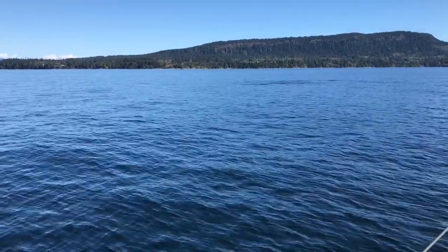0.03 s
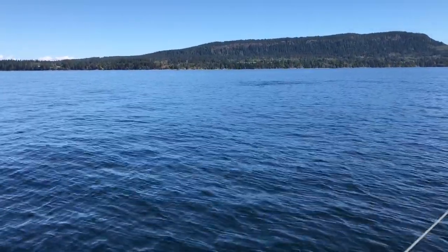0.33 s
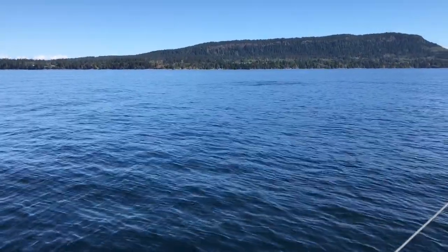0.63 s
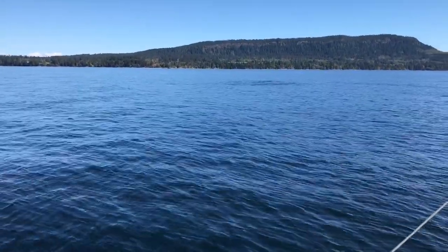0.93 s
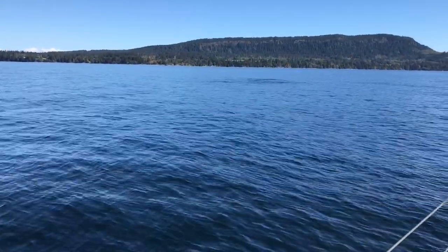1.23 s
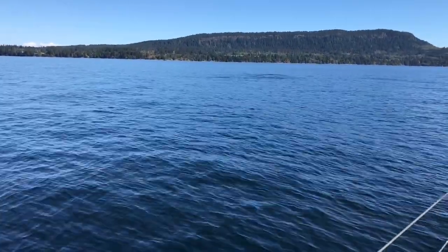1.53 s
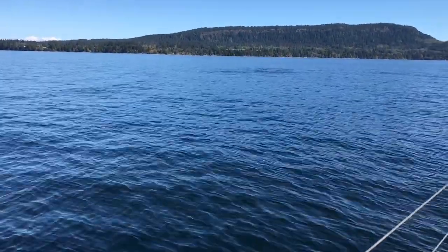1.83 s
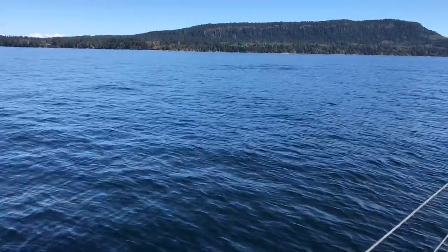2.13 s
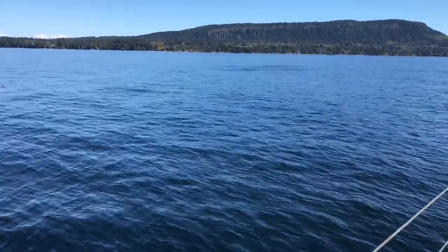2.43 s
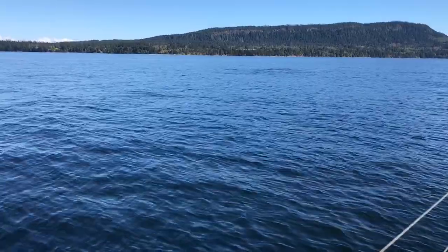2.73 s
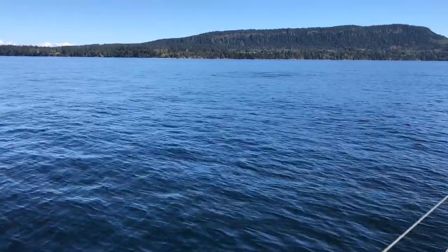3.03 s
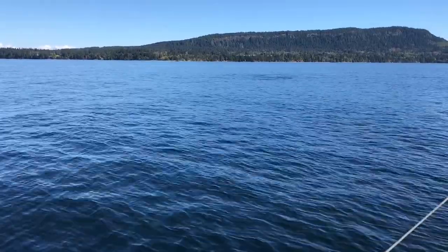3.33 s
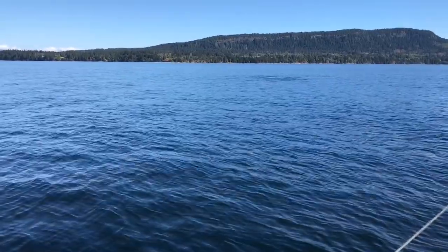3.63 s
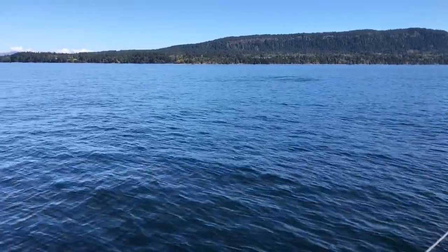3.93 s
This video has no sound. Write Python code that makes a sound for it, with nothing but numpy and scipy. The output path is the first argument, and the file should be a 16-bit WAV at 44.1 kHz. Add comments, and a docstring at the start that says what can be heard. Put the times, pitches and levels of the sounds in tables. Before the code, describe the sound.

A small boat's inboard engine chugs steadily, heard from on board over low wind. Early on, a wave rushes up the hull and collapses in hollow thumps. A few drops plop nearby, then a second wave splashes near the end.

```python
"""Small boat on open water

An inboard engine chugs along, throbbing through the hull under its clatter and thin gear whines.
Twice a wave runs up the side with a rush, throws spray and collapses in low thumps of trapped air.
Drops tick and plop nearby and foam fizzes, over a faint hiss of water and a low rumble of wind."""
import sys
import numpy as np
from scipy import signal
from scipy.fft import rfft, irfft
from scipy.io import wavfile
from scipy.ndimage import uniform_filter1d

SR = 44100
rng = np.random.default_rng(int(sys.argv[2]) if len(sys.argv) > 2 else 0)


def digitize_waveform(pressure):
    """Quantize a signal to 16-bit integers and store it at the path in sys.argv[1].

    Rows of a 2-D input are taken as channels; values are limited to [-1, 1].
    """
    field = np.atleast_2d(pressure).T
    bounded = np.clip(field, -1, 1)
    quanta = np.round(bounded * 32767).astype(np.int16)
    wavfile.write(sys.argv[1], SR, quanta)


N = 176400
T = np.arange(N) / SR

# The engine's drifting pace: time_s, cycles_per_s
ENGINE_SPEED = [(0.0, 12.792), (0.1, 12.782), (0.4, 13.245), (0.62, 13.123), (0.97, 13.39), (1.12, 13.134),
                (1.5, 13.286), (1.92, 12.78), (2.1, 12.933), (2.35, 12.396), (2.52, 12.931), (2.72, 12.914),
                (3.02, 12.434), (3.3, 12.722), (3.55, 12.47), (4.0, 12.748)]
# Exhaust and hull throbs in every engine cycle: place_cycles, cruise_pitch_hz, length_s, peak_db
ENGINE_THROBS = [(0.34, 71.5, 0.03, -30.5), (0.69, 60.6, 0.13, -33.5), (.819, 105, 0.041, -36),
                 (.84, 178.3, 0.064, -42.5), (.21, 175, 0.042, -44.5), (.52, 343, 0.052, -44.5),
                 (.05, 333, 0.051, -46)]
# Tone colour of the engine clatter: frequency_hz, relative_db
CLATTER_SPECTRUM = [(250, 14.5), (450, -2), (900, -3.5), (1600, -0.5), (2200, -8.5), (3100, -5.5),
                    (4400, -14.5), (5000, -38), (9000, -73)]
# Whines of the running gear: cruise_pitch_hz, level_db, loudest_place_cycles
GEAR_WHINES = [(697, -69, 0.45), (1245, -74.5, .76), (1424, -79, .76), (1600, -80, 0.68),
               (2120, -82.5, .76), (2505, -75, 0.71), (3085, -81, 0.6), (3490, -85, 0.63)]
# Tone colour of wind and distant water: frequency_hz, relative_db
AIR_SPECTRUM = [(15, -50), (28, -29), (45, -5), (70, -2), (120, -1.5), (200, -5.5), (280, -9), (450, -16),
                (1000, -23), (3000, -33), (4800, -43), (6000, -42), (8000, -48), (10300, -50),
                (12000, -47.5), (15500, -48)]
# The swell and fall of each wave, one list per wave: time_s, level_db, centre_hz
WAVE_SHAPES = [
    [(.1, -70, 905), (.32, -57.5, 810), (.42, -51, 744), (.52, -46, 776), (.555, -40.5, 840),
     (.605, -39, 870), (.645, -38.5, 670), (.7, -38.5, 656), (.74, -41.5, 614), (.79, -43.5, 520),
     (.86, -55, 484), (1.02, -57, 494), (1.1, -83, 500)],
    [(3.2, -69, 600), (3.38, -58, 600), (3.46, -50, 640), (3.57, -47, 530), (3.61, -37, 525),
     (3.645, -40, 575), (3.705, -37, 640), (3.77, -37.5, 510), (3.84, -41, 490), (3.89, -52, 420),
     (4, -56, 435)],
]
# Tone colour of a wave's rush: from_centre_octaves, relative_db
RUSH_SPECTRUM = [(-10, -25), (-6, 6.5), (-1.5, 3), (0.03, -0.5), (-0.11, 7), (0.04, -1.5), (2, -18),
                 (2, -17.5), (2.5, -36.5), (5.5, -57)]
# The hollow between hull and water, colouring every rush: frequency_hz, gain_db
HOLLOW_RESPONSE = [(100, 0), (170, -2), (260, 3), (370, 1.5), (470, -3.5), (620, 0.5), (1050, 3), (1350, 1),
                   (1650, 1), (1950, -3.5), (2800, -1.5), (4000, 6), (6000, -2)]
# Drops and small slaps: start_s, level_db, centre_hz, decay_s
DROP_HITS = [(.229, -41.5, 1010, 0.0044), (0.5535, -39, 9500, 0.0019), (.595, -42, 6000, 0.0014),
             (.614, -36, 8000, 0.0008), (0.7539, -33.5, 6950, 0.0004), (0.898, -39, 586, .004),
             (.956, -39, 527, .005), (1.1405, -44.5, 4000, 0.0011), (1.3084, -42, 2480, 0.0033),
             (1.4465, -41.5, 2600, .0035), (1.461, -51, 2400, .002), (1.3078, -47, 12000, .0014),
             (1.4493, -48, 11000, .0006), (2.815, -46, 900, .008), (3.079, -53, 5000, 0.0018),
             (3.6, -45, 11000, 0.001), (3.711, -44, 5950, 0.00025), (3.802, -45.5, 7000, 0.0015)]
# Bursts of spray: start_s, hold_s, level_db, centre_hz
SPRAY_BURSTS = [(0.301, 0.012, -58, 4200), (0.546, 0.012, -42, 1860), (0.564, 0.014, -44.5, 2300),
                (0.585, 0.0091, -45, 2380), (0.596, 0.021, -38.5, 990), (0.698, 0.0067, -56.5, 4530),
                (.746, 0.0029, -48, 2550), (0.7496, 0.0086, -35.5, 1020), (0.762, 0.01, -60, 2700),
                (1.19, .008, -76, 5800), (1.177, .015, -69, 6200), (3.208, .006, -65, 4500),
                (3.597, 0.0052, -42.5, 700), (3.613, 0.0095, -42, 2300), (3.66, 0.02, -58.5, 3630),
                (3.752, 0.0037, -56, 4200), (3.788, 0.0034, -47.5, 2780), (3.815, 0.0047, -53.5, 3160),
                (3.837, .004, -54, 2170)]
# Plops and bubbles that fall in pitch: start_s, level_db, start_hz, end_hz, glide_s, decay_s
BUBBLE_PLOPS = [(.304, -54, 4600, 4300, .01, .012), (.762, -47, 2720, 2660, .01, .011),
                (1.1417, -36, 910, 470, .0012, 0.0039), (1.177, -60, 6400, 5700, 0.0066, 0.011),
                (1.308, -32, 1090, 493, 0.0015, 0.0021), (1.446, -35.5, 2120, 920, 0.0019, 0.0025),
                (1.453, -43.5, 880, 697, 0.022, 0.012)]
# Patches of fizzing foam: start_s, length_s, level_db, centre_hz
FOAM_PATCHES = [(.54, .095, -64, 11500), (1.62, .42, -83, 11800), (3.59, .25, -75, 12500)]
# Air squeezed in a pocket of water: start_s, length_s, level_db, start_hz, end_hz
POCKET_GULPS = [(.605, 0.11, -39, 240.8, 540), (3.684, 0.0567, -44.5, 1144, 1045),
                (3.69, .1, -42.5, 270.2, 340.6), (3.801, .07, -47.5, 418, 330.5)]
# Trapped air thumping against the hull: start_s, envelope_peak_db, pitch_hz, rise_cycles
AIR_THUMPS = [(0.7056, -14, 245, .48), (0.709, -24, 85, 0.45), (.732, -31, 47, 1), (0.7602, -22.5, 225, .5),
              (0.766, -22, 71, 0.49), (3.668, -28, 119, 0.55), (3.693, -25.5, 151, .5),
              (3.702, -33, 278, 0.57), (3.76, -27.5, 263, 0.76), (3.793, -24.5, 292, 0.48),
              (3.786, -30, 93, 1.8)]

CRUISE_CYCLES_PER_S = 12.9


def amp(db):
    """Decibels to gain."""
    return 10 ** (np.asarray(db) / 20)


def unit(x):
    """Scales to rms 1."""
    return x / np.sqrt(np.mean(x ** 2) + 1e-20)


def add(mix, start_s, sound):
    """Lays a sound into the mix at its cue."""
    start = round(start_s * SR)
    sound = sound[max(-start, 0):]
    part = mix[max(start, 0):][:len(sound)]
    part += sound[:len(part)]


def noise(spectrum, ripple_db=0):
    """Noise of rms 1 coloured by a spectrum, with an optional ripple of narrow resonances."""
    points_hz, points_db = np.transpose(spectrum)
    hz = np.fft.rfftfreq(N, 1 / SR)
    ripple = unit(uniform_filter1d(uniform_filter1d(rng.standard_normal(len(hz)), size=90), size=60))
    colour_db = np.interp(np.log(hz + 1), np.log(points_hz), points_db) + ripple_db * ripple
    return unit(irfft(rfft(rng.standard_normal(N)) * amp(colour_db), N))


def wander(rate_hz):
    """Smooth random movement of rms 1, rolling off above rate_hz."""
    hz = np.fft.rfftfreq(N, 1 / SR)
    return unit(irfft(rfft(rng.standard_normal(N)) * np.exp(-(hz / rate_hz) ** 2) * (hz > 0), N))


def band(x, hz, q):
    """Plays a signal through one resonance and scales it to rms 1."""
    return unit(signal.lfilter(*signal.iirpeak(min(hz, SR / 3), max(q, .4), SR), x))


def tone(pitch_hz):
    """A sine that follows a pitch curve."""
    return np.sin(2 * np.pi * np.cumsum(pitch_hz) / SR)


def engine(cylinders=3, firing_db=-55, firing_place=.36):
    """The cylinders' low firing note, with throbs, clatter and whines locked to the same cycle."""
    speed = np.interp(T, *np.transpose(ENGINE_SPEED))
    cycles = np.cumsum(speed) / SR
    firing = amp(firing_db) * np.cos(cylinders * 2 * np.pi * (cycles - firing_place))
    return firing + throbs(speed, cycles) + clatter(cycles) + whines(speed, cycles)


def throbs(speed, cycles, pitch_follow=.75, spread_db=.8, jitter_s=.00006):
    """The chug: soft pulses of exhaust and hull whose pitch partly follows the engine speed."""
    out = np.zeros(N)
    for place, hz, length, db in ENGINE_THROBS:
        t = np.arange(-length / 2, length / 2, 1 / SR)
        centres = np.interp(np.arange(place, cycles[-1]), cycles, T)
        for centre, (late, accent) in zip(centres, rng.standard_normal((64, 2))):
            pitch = hz * (np.interp(centre, T, speed) / CRUISE_CYCLES_PER_S) ** pitch_follow
            throb = np.cos(np.pi * t / length) ** 2 * np.cos(2 * np.pi * pitch * t)
            add(out, centre - length / 2 + jitter_s * late, amp(db + spread_db * accent) * throb)
    return out


def clatter(cycles, level_db=-61.3, swing_db=3.8, grain_db=3, loudest_place=.8):
    """Grainy, ringing engine noise that swells once a cycle."""
    rattle = noise(CLATTER_SPECTRUM, ripple_db=6.5)
    swell = np.cos(2 * np.pi * (cycles - loudest_place))
    return rattle * amp(level_db + swing_db * swell + grain_db * wander(100))


def whines(speed, cycles, swing_db=2, rough_db=2):
    """Thin tones of the running gear that follow the engine speed, waver and swell once a cycle."""
    out = np.zeros(N)
    for hz, db, place in GEAR_WHINES:
        waver_hz = 14 * np.sqrt(hz / 1000)
        pitch = hz * speed / CRUISE_CYCLES_PER_S + waver_hz * wander(40)
        swell = np.cos(2 * np.pi * (cycles - place))
        out += amp(db + swing_db * swell + rough_db * wander(40)) * unit(tone(pitch))
    return out


def hull_hum(pitch_hz=337.9, waver_hz=6, level_db=-56.5):
    """The hull hums at its own pitch, wavering slightly."""
    return amp(level_db) * unit(tone(pitch_hz + waver_hz * wander(19.8)))


def wind_and_water(level_db=-51):
    """A steady bed of wind rumble and distant water hiss."""
    return amp(level_db) * noise(AIR_SPECTRUM)


def waves(gurgle_db=1.8, grain_db=1.4):
    """Water runs up the hull in a lumpy rush that swells, then darkens as the wave collapses."""
    out = np.zeros(N)
    for wave in WAVE_SHAPES:
        times, db, centre_hz = np.transpose(wave)
        hz, frame_s, spectrum = signal.stft(rng.standard_normal(N), SR, nperseg=512)
        octaves = np.log2((hz[:, None] + 1) / np.interp(frame_s, times, centre_hz))
        rush_db = np.interp(octaves, *np.transpose(RUSH_SPECTRUM))
        hollow_db = np.interp(hz, *np.transpose(HOLLOW_RESPONSE))[:, None]
        lumps = uniform_filter1d(rng.standard_normal(spectrum.shape), size=3, axis=0)
        lumps = unit(uniform_filter1d(lumps, size=3, axis=1))
        rush = signal.istft(spectrum * amp(rush_db + hollow_db + gurgle_db * lumps), SR)[1][:N]
        gate = (T >= times[0]) & (T <= times[-1])
        level_db = np.interp(T, times, db)
        out += gate * (unit(rush) * amp(level_db + grain_db * wander(89)) + crackle(level_db))
    return out


def crackle(wave_db, clicks_per_s=140, relative_db=-32.5, spread_db=3):
    """Sparse clicks of bursting droplets that ride the level of a wave."""
    sizes = amp(spread_db * np.minimum(rng.exponential(size=N), 3)) * rng.choice([-1, 1], N)
    clicks = sizes * (rng.random(N) < clicks_per_s / SR)
    return band(clicks, hz=3500, q=.97) * amp(wave_db + relative_db)


def droplets(per_s=14, softest_db=-67.5, spread_db=3, tries=200):
    """A fine scatter of tiny bubbles pinging all along; the higher ones die sooner."""
    out, t = np.zeros(N), T[:SR // 16]
    for when, softness, pitch, chance in rng.random((tries, 4)):
        if chance < per_s * T[-1] / tries:
            hz = 2500 * 4.5 ** pitch
            ping = np.exp(-t * hz / 5) * np.sin(2 * np.pi * hz * t)
            add(out, when * T[-1], amp(softest_db - spread_db * np.log(max(softness, .05))) * ping)
    return out


def drops(tick_db=-30):
    """Nearby drops land as short slaps with a sharp tick on top."""
    out, t = np.zeros(N), T[:SR // 16]
    for start, db, hz, decay in DROP_HITS:
        body, tick = rng.standard_normal((2, len(t)))
        slap = band(band(body, hz, q=1), hz, q=.5)
        add(out, start, amp(db) / 2 * np.exp(-t / decay) * (slap + amp(tick_db) * tick))
    return out


def spray(rise_s=.003, fall_s=.0071, top_hz=3830, fizz_db=-33, grain_db=2.2):
    """Thrown water: short grainy hisses with a trace of bright fizz."""
    out, t = np.zeros(N), T[:SR // 8]
    soften = signal.butter(2, top_hz, fs=SR)
    for start, hold, db, hz in SPRAY_BURSTS:
        body, fizz = rng.standard_normal((2, len(t)))
        hiss = unit(signal.lfilter(*soften, band(body, hz, q=1.7))) + amp(fizz_db) * fizz
        envelope = np.minimum(t / rise_s, 1) * np.exp(-np.maximum(t - hold, 0) / fall_s)
        add(out, start - rise_s / 2, envelope * amp(db + grain_db * wander(610)[:len(t)]) * hiss)
    return out


def plops(rise_s=.00033, shake_depth=.09, rough_db=3):
    """Small pockets of air ring briefly and unevenly while their pitch drops."""
    out, t = np.zeros(N), T[:SR // 8]
    shake, rough = wander(400), wander(400)
    for start, db, start_hz, end_hz, glide, decay in BUBBLE_PLOPS:
        now = slice(round(start * SR), round(start * SR) + len(t))
        pitch = end_hz + (start_hz - end_hz) * np.exp(-t / glide)
        ring = tone(pitch * (1 + shake_depth * shake[now]))
        envelope = np.minimum(t / rise_s, 1) * np.exp(-t / decay)
        add(out, start, amp(db + rough_db * rough[now]) * envelope * ring)
    return out


def foam(q=2.5, grain_db=3):
    """Tiny bursting bubbles fizz in patches that swell and fade."""
    out = np.zeros(N)
    fizz, grain = rng.standard_normal(N), amp(grain_db * wander(400))
    for start, length, db, hz in FOAM_PATCHES:
        swell = np.sin(np.pi * np.clip((T - start) / length, 0, 1))
        out += amp(db) * swell * band(band(fizz, hz, q), hz, q)
    return out * grain


def gulps(width_hz=82):
    """A hollow note of churning water that glides as its air pocket changes size."""
    out = np.zeros(N)
    smooth = signal.butter(2, width_hz / 2, fs=SR)
    for start, length, db, start_hz, end_hz in POCKET_GULPS:
        t = np.arange(0, length, 1 / SR)
        churn = signal.lfilter(*smooth, rng.standard_normal((2, SR)))[:, -len(t):]
        pitch = start_hz * (end_hz / start_hz) ** (t / length)
        phase = 2 * np.pi * np.cumsum(pitch) / SR
        gulp = unit(churn[0] * np.cos(phase) + churn[1] * np.sin(phase))  # narrow noise on the pitch
        add(out, start, amp(db) * np.sin(np.pi * t / length) ** .5 * gulp)
    return out


def thumps():
    """Air trapped against the hull booms for a few cycles as a wave collapses."""
    out, t = np.zeros(N), T[:SR // 8]
    for start, db, hz, rise_cycles in AIR_THUMPS:
        age = t * hz / rise_cycles
        envelope = (age * np.exp(1 - age)) ** 2
        add(out, start, amp(db) * envelope * np.sin(2 * np.pi * hz * t))
    return out


def scene():
    """The boat, the wind and the water around the hull, in mono."""
    bed = engine() + hull_hum() + wind_and_water()
    wash = waves() + gulps() + spray() + thumps()
    sparkle = droplets() + drops() + plops() + foam()
    return (bed + wash + sparkle)[None]


def record(dry, low_cut_hz=28, high_cut_hz=15800):
    """Steep cuts trim the deepest rumble and the very top of the hiss."""
    hz = np.fft.rfftfreq(N, 1 / SR)
    thinned = irfft(rfft(dry) * (1 - 1 / (1 + (hz / low_cut_hz) ** 10)), N)
    high_cut = signal.firwin(511, high_cut_hz, window=("kaiser", 9), fs=SR)
    return signal.oaconvolve(thinned, high_cut[None], "same")


dry = scene()
out = record(dry)
digitize_waveform(out)
```